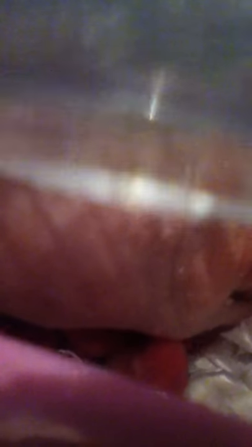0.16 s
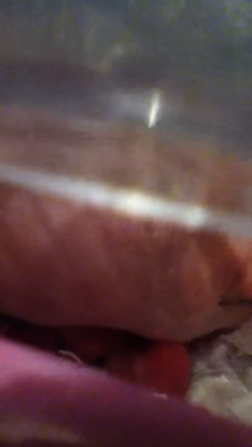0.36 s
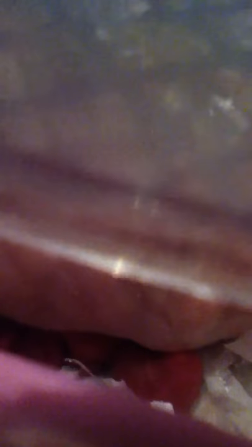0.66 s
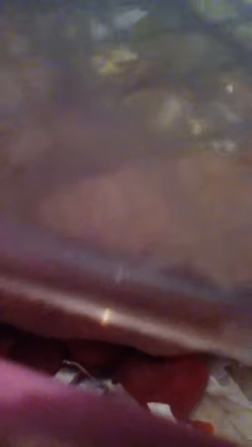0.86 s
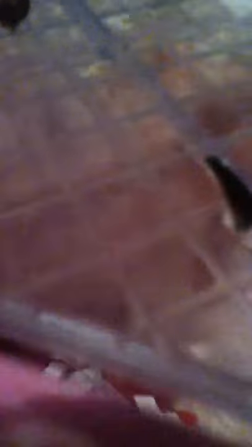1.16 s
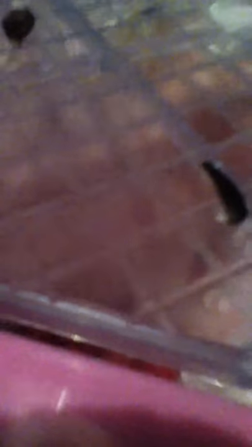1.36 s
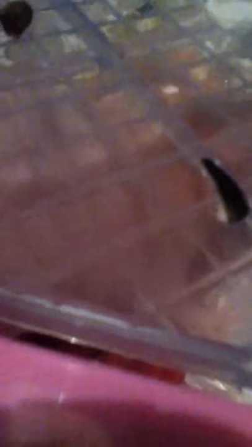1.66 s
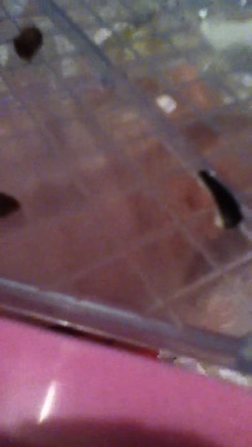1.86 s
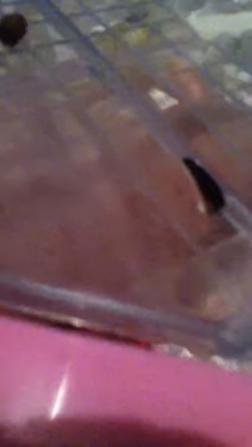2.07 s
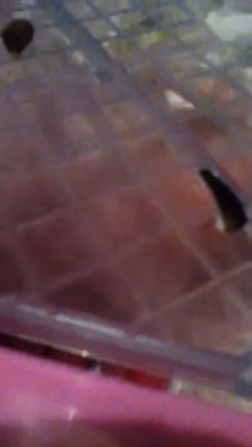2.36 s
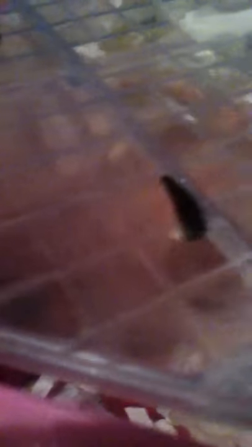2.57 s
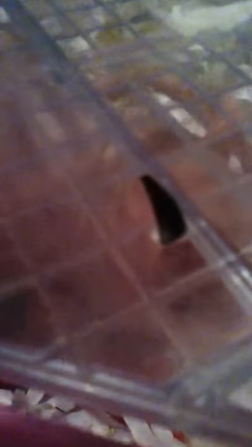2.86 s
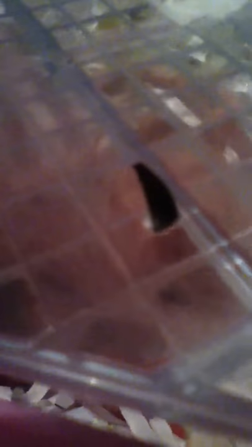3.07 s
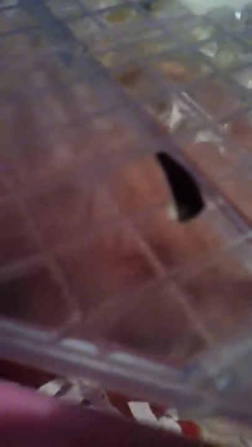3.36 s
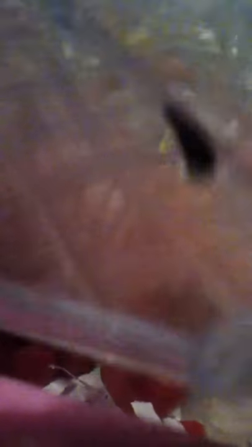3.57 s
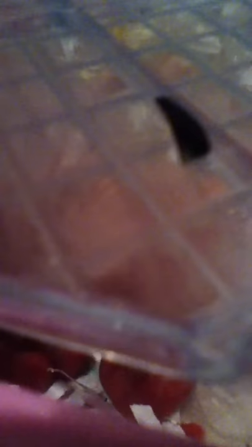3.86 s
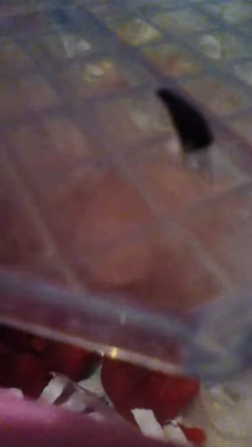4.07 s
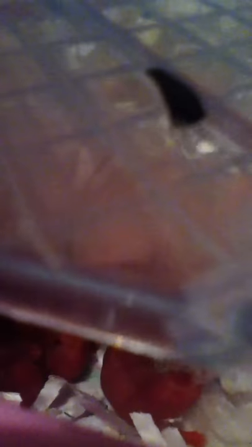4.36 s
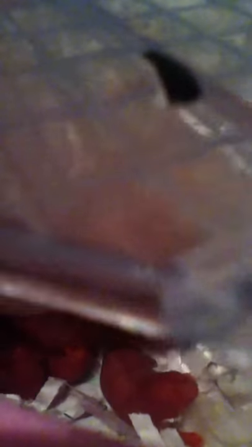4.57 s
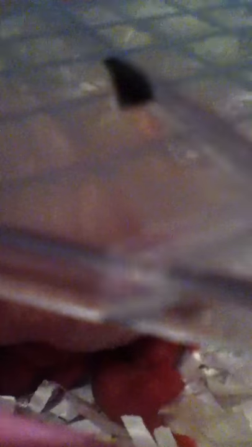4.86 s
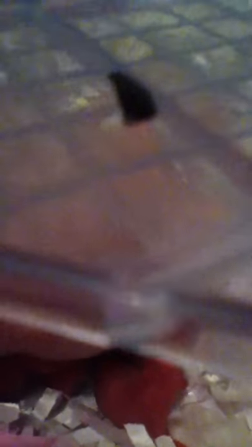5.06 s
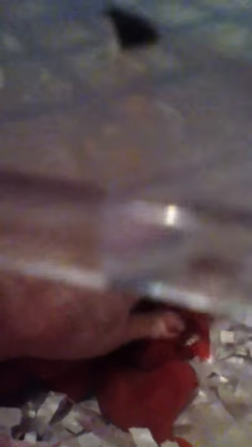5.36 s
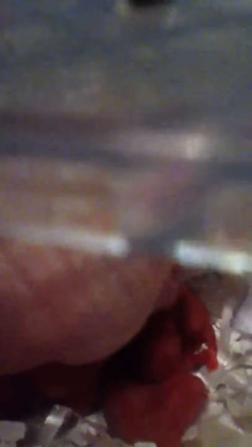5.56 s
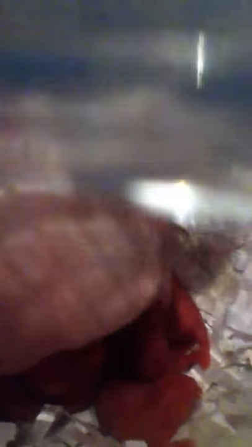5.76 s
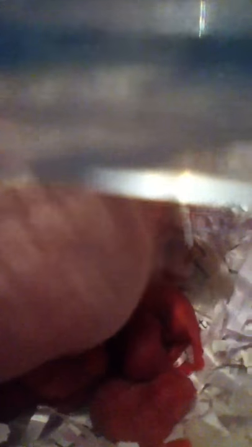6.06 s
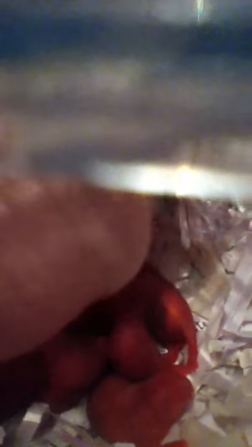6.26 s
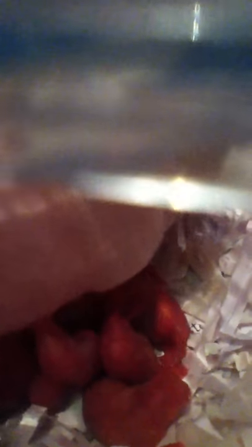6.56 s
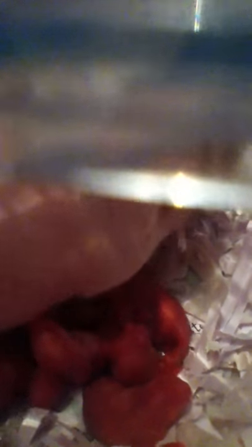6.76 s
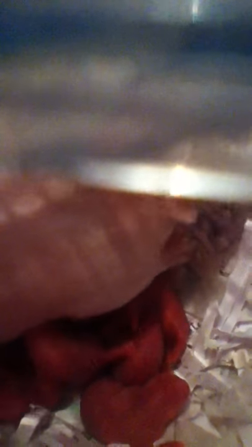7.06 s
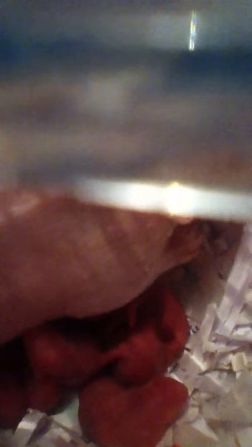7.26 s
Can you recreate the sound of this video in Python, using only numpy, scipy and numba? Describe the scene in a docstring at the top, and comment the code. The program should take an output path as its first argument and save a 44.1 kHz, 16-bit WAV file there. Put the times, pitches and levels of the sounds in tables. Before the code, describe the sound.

Close up in a quiet room, paper bedding crackles softly as a small animal shuffles in its nest. Early on the plastic cage is bumped, with a brief scrape and one loud, hollow clack, then a dull thump a second later. Newborn pups squeak faintly now and then. The light rustling and clicking go on, joined near the end by small paw taps, a faint rub and three quick squeaks.

```python
"""Shredded paper rustles and snaps over the hum of a quiet room and a faint electrical whine.
A mother rodent is shifting over her newborn pups in a plastic cage, and each stir makes the strips slip.
The pups give a few thin, raspy squeaks, each a larynx tone shaped by throat and snout resonances.
The cage is bumped: a short stick-slip scrape and a loud clack, then soft thuds, as its modes ring.
Later come light paw taps and a faint rubbing as she settles."""
import sys
import numpy as np
from scipy import signal
from scipy.fft import rfft, irfft
from scipy.io import wavfile
from scipy.ndimage import uniform_filter1d
from numba import njit

SR = 44100
rng = np.random.default_rng(int(sys.argv[2]) if len(sys.argv) > 2 else 0)


def wav_record(signal):
    """Record a signal, one row per channel, as 16-bit PCM in the file named by sys.argv[1]."""
    frames = np.transpose(np.atleast_2d(signal))
    bounded = np.clip(frames, -1, 1)
    # unit amplitude maps onto the largest positive 16-bit level
    quanta = np.round(bounded * 32767).astype(np.int16)
    wavfile.write(sys.argv[1], SR, quanta)


N = 327222
T = np.arange(N) / SR

# stirs of the paper: (midpoint [s], duration [s], level [dB])
PAPER_STIRS = [(.01, 0.11, -60), (.17, .4, -59.5), (.88, 1, -64), (1.28, 0.15, -66), (1.47, 0.083, -57.5),
               (3.14, 0.23, -63), (3.38, 0.24, -67), (3.77, 0.48, -63.5), (4.2, 0.48, -67.5),
               (4.68, 0.14, -62), (4.98, 0.083, -64), (5.88, 0.61, -66.5), (6.45, 1, -69), (7.15, .45, -69)]
# rustling paper: (frequency [Hz], relative spectral density [dB])
PAPER_SPECTRUM = [(700, -25), (1400, 6.5), (3000, 2.5), (5000, -2), (8500, -9.5), (12000, -20),
                  (16000, -16)]
# the loudest creases snapping: (time [s], peak level [dB], centre frequency [Hz])
CREASE_SNAPS = [(.011, -33, 6500), (.1043, -40.5, 6700), (.1487, -39.5, 4870), (.162, -40, 2480),
                (.5245, -39, 4300), (.7129, -51, 3820), (3.7734, -42, 4500), (4.6998, -46, 3970),
                (4.7966, -35.5, 3800), (4.9383, -44, 4870), (5.4195, -30, 7750), (5.4302, -41, 8000),
                (5.932, -40.5, 4960), (6.3875, -34.5, 2450), (6.4259, -33.5, 4300), (6.454, -40.5, 5500),
                (6.5725, -36, 5430), (6.8255, -38.5, 2800), (6.9502, -42.5, 8400), (7.1278, -42, 1760),
                (7.3892, -45.5, 3430)]
# how hard the mother shuffles against the floor: (time [s], level [dB])
BODY_EFFORT = [(0, -68), (.5, -73), (1.0, -54), (1.55, -62.5), (3.3, -65), (4.4, -60.5), (5.85, -58),
               (6.1, -61), (6.6, -55), (6.75, -70), (7.4, -81)]
# her body sliding: (frequency [Hz], relative spectral density [dB])
SHUFFLE_SPECTRUM = [(75, -12), (140, -16), (220, 4.5), (330, 0.5), (480, -5.5), (800, -9), (1150, -6.5),
                    (2000, -21.5), (4000, -62), (16000, -49)]
# room noise: (frequency [Hz], relative spectral density [dB])
ROOM_SPECTRUM = [(25, -17), (55, -11), (95, -3), (200, -1), (330, -11.5), (550, -13.5), (1200, -14.5),
                 (1700, -18.5), (2600, -20.5), (5000, -22.5), (10000, -24.5), (15800, -30)]
# blows on the cage: (time [s], gain [dB], contact cut-off [Hz]); a soft contact has a low cut-off
CAGE_BLOWS = [(0.191, -34, 1030), (0.611, -44.5, 300), (0.888, -43, 490), (.935, -38.5, 1000),
              (0.967, -37, 700), (1.008, -37.5, 350), (1.0772, -14.5, 6000), (1.0848, -9.2, 6000),
              (1.1166, -24, 11000), (1.363, -41, 305), (1.914, -43, 700), (1.9422, -37, 710),
              (2.217, -41, 905), (2.225, -27, 219), (2.2454, -19.5, 127), (2.2634, -25, 110),
              (5.4415, -36.5, 400), (5.851, -38.5, 198)]
# normal modes of the tub and lid: (frequency [Hz], relative level [dB], 60 dB decay time [s])
TUB_MODES = [(66, -25, .22), (118, -29, .36), (155, -16, .45), (190, -14, .23), (228, -13, .18),
             (245, -6, .05), (270, -12, .18), (327, -14, .18), (365, -4, .045), (391, -8, .13),
             (458, -15, .13), (507, -9, .12), (555, -13, .14), (709, -25, .16), (891, -13, .15),
             (915, -10, .035), (955, -17, .14), (1194, -20, .14), (1255, -18, .14), (1421, -20, .13),
             (1580, -22, .13), (1802, -23, .14), (1941, -23, .15), (2262, -25, .14), (2430, -25, .13),
             (3375, -27, .14), (3742, -26, .14)]
# their crowd of weaker modes: (frequency [Hz], relative spectral density [dB], 60 dB decay time [s])
TUB_CLATTER = [(50, -27, .22), (128, 3, 0.23), (352, 7.5, 0.029), (686, -11.5, 0.23), (1300, -1.5, 0.06),
               (2440, -15, 0.23), (4240, -19, 0.25), (8550, -21, 0.18), (12000, -21.5, 0.082),
               (16000, -34, .16)]
# squeaks: (time [s], duration [s], attack [s], start pitch [Hz], middle pitch [Hz], end pitch [Hz],
# level [dB], start roughness [0-1], end roughness [0-1], throat resonance [Hz], step per harmonic [dB])
PUP_CRIES = [(0.723, .06, 0.018, 1800, 1570, 1460, -50.5, 0.53, 0.35, 3700, -15),
             (1.939, 0.056, .02, 4400, 4500, 4450, -66, 0.25, 0.22, 4400, -9),
             (2.111, 0.069, .003, 4400, 4480, 4160, -50, 0.033, .05, 4400, -19),
             (2.205, .215, 0.11, 1061, 1448, 2767, -51.5, 0.98, 0.65, 4630, 1),
             (2.389, 0.06, .012, 2720, 3260, 3690, -55.5, .45, .05, 3780, 3),
             (3.085, 0.029, .008, 1314, 1307, 1200, -59, 0.96, .7, 1670, -8),
             (3.15, 0.037, .002, 1205, 1375, 1430, -54, 1, 0.76, 4000, 2),
             (3.169, .052, 0.0073, 2740, 3040, 2500, -53.5, 0.26, .12, 3470, 2),
             (4.23, 0.043, 0.017, 1385, 1320, 1200, -58, .9, .7, 1640, -4),
             (6.479, 0.036, .002, 820, 801, 677, -44.5, 0.97, 0.72, 3300, -1),
             (6.511, 0.039, 0.0088, 2500, 2520, 2870, -43, .1, 0.17, 3620, -5.5),
             (6.545, 0.027, 0.003, 2740, 2720, 2670, -41.5, .5, .2, 3060, -2.5)]
# plastic slipping on plastic before the clack: (time [s], level [dB])
PLASTIC_SLIPS = [(.937, -65), (0.958, -38), (.968, -31), (0.977, -47)]
# scraping plastic: (frequency [Hz], relative spectral density [dB])
SCRAPE_SPECTRUM = [(410, -55), (700, -18), (1340, -10), (1800, -1), (2560, -13.5), (3360, -1.5),
                   (4240, -12.5), (5220, -5.5), (5790, -17), (7120, -12), (7800, -18), (8540, -11),
                   (15500, -38)]
# paws on the cage floor: (time [s], peak level [dB], centre frequency [Hz])
PAW_TAPS = [(2.4835, -44.5, 610), (4.797, -54, 700), (5.1935, -41, 388), (5.197, -44, 1040),
            (5.4205, -43, 840), (5.4685, -50, 710), (5.896, -41.5, 400), (5.8975, -41, 1440),
            (6.8245, -46.5, 1480)]
# rubs as she settles: (midpoint [s], duration [s], level [dB])
SETTLING_RUBS = [(5.98, 0.21, -68), (6.38, 1, -60.5)]

CUTOFF_HZ = 15900


def from_db(db):
    """Amplitude ratio of a level in decibels."""
    return 10 ** (np.asarray(db) / 20)


def rms_one(x):
    """Normalise a signal to unit mean power."""
    return x / np.sqrt(np.mean(x ** 2) + 1e-20)


def add(out, s, sound):
    """Superpose a sound from time s on."""
    at = max(0, round(s * SR))
    out[at:at + len(sound)] += sound[:N - at]


def swells(rows):
    """Amplitude envelope of movements that each rise and fall in a raised-cosine arch."""
    return sum(from_db(db) * np.cos(np.pi * np.clip((T - s) / length, -.5, .5)) ** 2
               for s, length, db in rows)


def at_hz(points, hz, column=1):
    """Interpolate one column of a spectrum table on a log-frequency axis."""
    table = np.array(points)
    return np.interp(np.log(hz + 1e-3), np.log(table[:, 0]), table[:, column])


def butter(x, hz, kind, order=2):
    """Butterworth filter, maximally flat in its passband."""
    return signal.sosfilt(signal.butter(order, np.clip(hz, 10, .45 * SR), kind, fs=SR, output="sos"), x)


def colour(x, spectrum):
    """Spectral shaping to unit rms, with a roll-off below the table's lowest frequency."""
    hz = np.linspace(0, SR / 2, N // 2 + 1)
    skirt = np.minimum(hz / spectrum[0][0], 1) ** 2
    return rms_one(irfft(rfft(x) * from_db(at_hz(spectrum, hz)) * skirt, N))


def drift(per_s, size):
    """Random modulation of unit rms, interpolated between per_s values a second."""
    knots = np.arange(size) * per_s / SR
    return rms_one(np.interp(knots, np.arange(N), rng.standard_normal(N)))


def grains(per_s, spread_db):
    """Friction as a Poisson train of tiny slips, most weak and a few strong."""
    sizes = from_db(spread_db * np.minimum(rng.exponential(1, N), 4))
    return (rng.random(N) < per_s / SR) * sizes * rng.choice([-1, 1], N)


@njit
def resonate(x, hz, q):
    """Band-pass response of a damped oscillator with quality factor q."""
    out, low, band = np.zeros(len(x)), 0., 0.
    g = np.tan(np.pi * hz / SR)
    for i in range(len(x)):
        out[i] = (band + g * (x[i] - low)) / (1 + g * (g + 1 / q))
        band = 2 * out[i] - band
        low += 2 * g * out[i]
    return out


def ticks(rows, decay_s, tail_db, tail_s, width, leak_db):
    """Exponentially damped bursts of band noise, each with a short tail of reflections off the walls."""
    out, t = np.zeros(N), np.arange(SR // 10) / SR
    for s, db, hz in rows:
        envelope = np.exp(-t / decay_s) + from_db(tail_db) * np.exp(-t / tail_s)
        burst = rng.standard_normal(len(t)) * envelope
        band = butter(burst, [hz / (1 + width), hz * (1 + width)], "band", order=1)
        tick = butter(band + from_db(leak_db) * burst, hz / 6, "high")
        add(out, s, from_db(db) * tick / np.abs(tick).max())
    return out


def paper_rustle(stirring):
    """Superposition: many tiny slips of the paper strips merge into a crackling noise."""
    clumps = from_db(2 * drift(per_s=35, size=N))   # a strip lets go in little runs
    crackle = grains(per_s=1200, spread_db=3.5)
    return stirring * colour(crackle * clumps, PAPER_SPECTRUM)


def paper_snaps(stirring, small_per_s=23, small_hz=4740, over_rustle_db=18):
    """Sudden release of elastic energy: creases snap, the small ones by chance, as strong as the stir."""
    small = []
    for when, force, pitch in rng.random((int(small_per_s * N / SR), 3)):
        peak_db = 20 * np.log10(stirring[int(when * N)] * (.5 + force)) + over_rustle_db
        small.append((when * N / SR, peak_db, small_hz * 2 ** (pitch - .5)))
    return ticks(CREASE_SNAPS + small,
                 decay_s=0.00064, tail_db=-12.5, tail_s=0.011, width=0.46, leak_db=-20.5)


def body_shuffle(effort):
    """Sliding friction of the mother's body on the floor gives a low, grainy noise."""
    return effort * colour(grains(per_s=1100, spread_db=2.0), SHUFFLE_SPECTRUM)


def room(rush_db=-58, whine_hz=14993, whine_db=-82):
    """Stationary background: a continuous noise spectrum and the single line of an electrical whine."""
    rush = from_db(rush_db) * colour(rng.standard_normal(N), ROOM_SPECTRUM)
    whine = from_db(whine_db) * rms_one(np.sin(2 * np.pi * whine_hz * T))
    return rush + whine


def cage_clatter(t):
    """Modal overlap: weak modes too dense to tell apart act as bands of decaying noise."""
    edges = np.geomspace(45, 17000, 18)
    clatter = 0
    for low, high in zip(edges, edges[1:]):
        centre = np.sqrt(low * high)
        decay = np.exp(-np.log(1000) * t / at_hz(TUB_CLATTER, centre, column=2))
        band = rms_one(butter(rng.standard_normal(len(t)) * decay, [low, high], "band"))
        energy = np.mean(decay ** 2) * (high - low) / (SR / 2)   # wide, slowly dying bands hold more
        clatter = clatter + from_db(at_hz(TUB_CLATTER, centre)) * np.sqrt(energy) * band
    return clatter


def cage_knocks(modes_db=-4.5, clatter_db=4.0, crack_db=7.5, crack_s=0.0042, uneven_db=2.0):
    """Impact excitation: each blow rings the cage's damped modes; a soft contact leaves out the treble."""
    out, t = np.zeros(N), np.arange(SR * 3 // 5) / SR
    hz, mode_db, t60 = np.transpose(TUB_MODES)[:, :, None]
    decay = np.exp(-np.log(1000) * t / t60)
    crack = 1 + from_db(crack_db) * np.exp(-t / crack_s)   # the first instant is the hardest
    for s, db, contact_hz in CAGE_BLOWS:
        strength = from_db(mode_db + uneven_db * rng.standard_normal(hz.shape))
        modes = np.sum(strength * np.sin(2 * np.pi * hz * t) * decay, axis=0)
        ring = from_db(modes_db) * modes + from_db(clatter_db) * cage_clatter(t) * crack
        add(out, s, from_db(db) * butter(ring, contact_hz, "low"))
    return butter(out, 120, "high", order=3)   # a small tub radiates no deep bass


def pup_cry(row, jitter=0.113, hiss=0.6, tract_q=4.8, snout_hz=4660, snout_gain=0.16, chest_gain=0.29,
            mouth_hz=11000, release_s=.011):
    """Source and filter: a tiny larynx drives throat and snout; roughness adds pitch jitter and hiss."""
    length, attack_s, start_hz, middle_hz, end_hz, db, rough_start, rough_end, throat_hz, step_db = row
    progress = np.linspace(0, 1, int(length * SR))
    pitch = np.polyval(np.polyfit([0, .5, 1], [start_hz, middle_hz, end_hz], 2), progress)
    rough = np.clip(rough_start + (rough_end - rough_start) * progress, 0, 1)
    wobble = 1 + jitter * rough * drift(per_s=1500, size=len(progress))
    phase = 2 * np.pi * np.cumsum(pitch * wobble) / SR
    harmonic = np.arange(1, 13)[:, None]
    weights = from_db(step_db * (harmonic - 1)) * (harmonic * pitch < CUTOFF_HZ)
    pulses = np.sum(weights * np.cos(harmonic * phase), axis=0) / np.sqrt(np.sum(weights ** 2, axis=0))
    breath = hiss * rough * rng.standard_normal(len(progress)) * (1 + np.cos(phase))
    source = pulses + breath
    tract = resonate(source, throat_hz, tract_q) + snout_gain * resonate(source, snout_hz, tract_q)
    chest = chest_gain * np.sin(phase)   # the fundamental also passes through the body wall
    voice = butter(tract - chest, mouth_hz, "low")
    voice /= np.sqrt(uniform_filter1d(voice ** 2, size=300) + 1e-12)   # hold the short-term rms at 1
    push = np.clip(length * np.minimum(progress / attack_s, (1 - progress) / release_s), 0, 1)
    return voice * from_db(db) * np.sin(np.pi / 2 * push)


def pups():
    """Superposition of the squeaks from the nest."""
    out = np.zeros(N)
    for s, *row in PUP_CRIES:
        add(out, s, pup_cry(row))
    return out


def cage_scrape(rise_s=0.0022, decay_s=0.018, drag_start_s=0.89, drag_end_s=1.2, drag_db=-55.5):
    """Stick-slip friction of plastic: sharp, decaying slips add in power to a light, steady drag."""
    power = from_db(drag_db) ** 2 * ((T > drag_start_s) & (T < drag_end_s))
    for s, db in PLASTIC_SLIPS:
        age = np.clip(T - s, 0, 1)
        slip = from_db(db) * np.minimum(age / rise_s, 1) * np.exp(-age / decay_s)
        power = power + slip ** 2
    return np.sqrt(power) * colour(grains(per_s=11000, spread_db=2.5), SCRAPE_SPECTRUM)


def paw_taps():
    """Light impacts of paws on the plastic floor excite a narrow, quickly damped band."""
    return ticks(PAW_TAPS, decay_s=0.007, tail_db=-31, tail_s=0.0046, width=0.1, leak_db=-56)


def settling_rub(hz=1430, q=15):
    """Friction noise through one narrow resonance: a faint rubbing as the mother settles."""
    return swells(SETTLING_RUBS) * rms_one(resonate(rng.standard_normal(N), hz, q))


def scene():
    """All sources superpose in one channel; the mother's effort drives both shuffle and paper."""
    effort = from_db(np.interp(T, *np.transpose(BODY_EFFORT), left=-120, right=-120))
    stirring = np.hypot(swells(PAPER_STIRS), from_db(-12) * effort)   # her weight works the paper too
    cage = cage_scrape() + cage_knocks() + paw_taps()
    bedding = paper_rustle(stirring) + body_shuffle(effort) + settling_rub() + paper_snaps(stirring)
    return (cage + bedding + pups() + room())[None]


def record(dry):
    """Band limiting: an elliptic low-pass filter cuts the top steeply."""
    return signal.sosfilt(signal.ellip(12, .1, 80, CUTOFF_HZ, fs=SR, output="sos"), dry)


dry = scene()
out = record(dry)
wav_record(out)
```